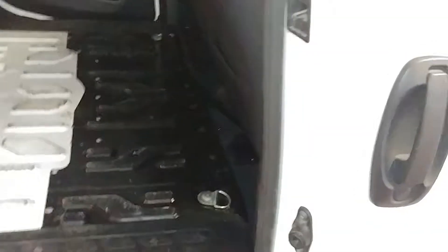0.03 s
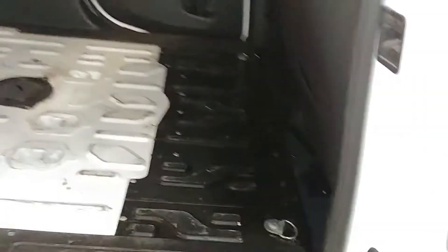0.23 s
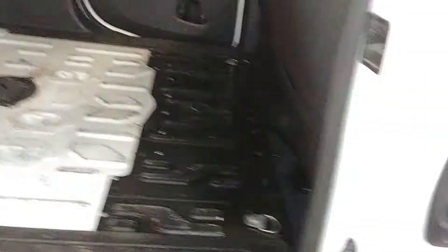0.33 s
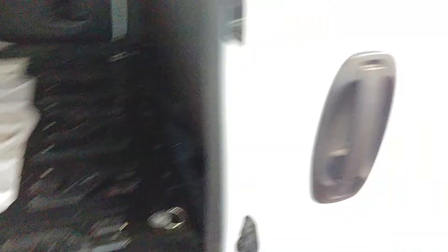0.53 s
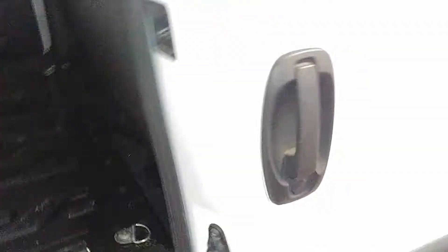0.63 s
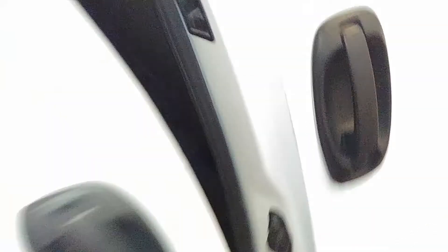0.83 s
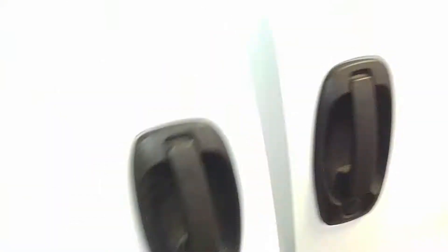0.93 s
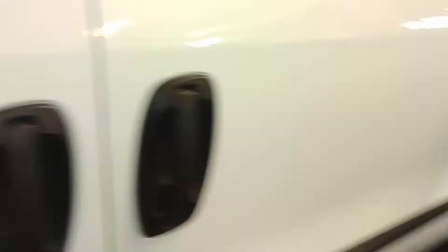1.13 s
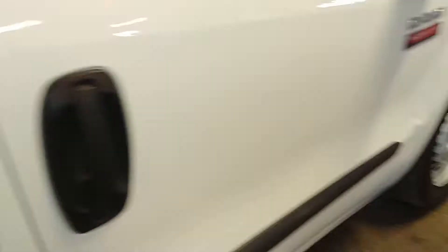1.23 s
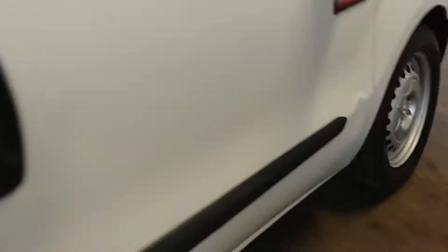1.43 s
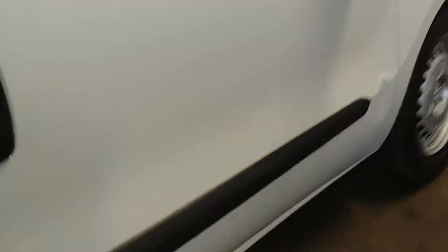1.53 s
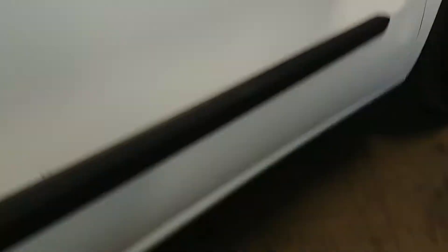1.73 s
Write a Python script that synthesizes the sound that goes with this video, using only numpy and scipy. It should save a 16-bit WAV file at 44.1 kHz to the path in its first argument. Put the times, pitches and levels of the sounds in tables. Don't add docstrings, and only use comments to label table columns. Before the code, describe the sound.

A van's sliding door closes, heard close up. Faint distant traffic and machinery hum, then small knocks at 0.2 s and a hard, bouncing metallic snap at 0.26 s. From about 0.4 s rollers rumble along the track, growing louder, with bright loose-metal ticks and hollow panel jolts. At 1.1 s it slams: latch crunch, deep body boom, low thumps until 1.4 s, then a long, spacious echo.

```python
import sys
import numpy as np
from scipy import signal
from scipy.fft import rfft, irfft
from scipy.io import wavfile
from scipy.ndimage import uniform_filter1d, minimum_filter1d

SR = 44100
rng = np.random.default_rng(int(sys.argv[2]) if len(sys.argv) > 2 else 0)


def dump_mix(stems):
    frames = np.atleast_2d(stems).T
    limited = np.clip(frames, -1, 1)
    pcm = np.round(limited * 32767).astype(np.int16)
    wavfile.write(sys.argv[1], SR, pcm)


def convert_level_to_amplitude(level_db):
    exponent = np.asarray(level_db, float) / 20
    return 10 ** exponent


N = 79380
T = np.arange(N) / SR

# frequency in Hz, density in dB per Hz.
YARD_AIR = [(40, -17.5), (80, 0), (200, -1), (500, -5.5), (1000, -13.5), (2500, -23), (5000, -46),
            (16000, -47)]
# frequency in Hz, width in Hz, level in dB.
YARD_HUMS = [(73, 18, -35.5), (374.2, 7.7, -36)]
YARD_DB = -36.5

# frequency in Hz, T60 in s.
ECHO_T60 = [(60, 1.03), (250, 1.78), (1000, 2.38), (2000, 2.95), (4000, 3.15), (8000, 0.42)]
# frequency in Hz, gain in dB.
ECHO_SEND = [(60, 1.5), (300, 1), (1000, 0), (2500, -3.5), (6000, -8.5), (13000, -12)]
# frequency in Hz, side share from 0 to 1.
SIDE_SHARE = [(60, 0.29), (300, 0.24), (1000, 0.93), (2500, 1.), (9000, 1.)]
ECHO_DB, ECHO_GAP_S = -6, 0.0027

# start in seconds, peak in dB, tilt in dB per octave.
TICKS = [(0.3257, -15.5, 3.5), (0.5818, -19, 5), (0.6037, -13.5, 4), (0.6272, -13.5, 6),
         (0.6401, -13.5, -2.5), (0.654, -30, -3.5), (0.6825, -13, 5.5), (0.6958, -38, -3.5),
         (0.7204, -18, 0), (0.8586, -19, -2.5), (0.8754, -25, 0.5), (.9674, -30.5, -15.5),
         (1.0866, -24, -3), (1.093, -13.5, -2.5), (1.1, -8, -0.5), (1.114, -19, 1), (1.165, -29, 0.5),
         (1.175, -29, -0.5)]
# frequency in Hz, density in dB per Hz.
TICK_SPECTRUM = [(1000, -24), (3000, -14), (5300, 7), (6500, -2.5), (8000, 0), (12500, 1), (16000, -4.5)]
TICK_T60_S = 0.013
RATTLE_START_S, RATTLE_END_S, RATTLE_FADE_S, RATTLE_DB = 0.49, 0.745, 0.012, -49

# start in seconds, peak in dB, tilt in dB per octave.
KNOCKS = [(.187, -20.5, -8), (.196, -22, -12), (.208, -24.5, 9.5), (.375, -19, 2), (.385, -29.5, -2),
          (.659, -17, -6), (.845, -21.5, 2), (.859, -15.5, 2), (.897, -31, 2), (.929, -23.5, -3.5),
          (.963, -15.5, -3), (1.079, -11, -1.5), (1.088, -9, -1.5), (1.097, -9.5, 1.5), (1.118, -32, -5),
          (1.165, -44, -10), (1.676, -29.5, -4.5)]
# frequency in Hz, density in dB per Hz.
KNOCK_SPECTRUM = [(200, -18), (700, -0.5), (1800, 3), (2800, -0.5), (3900, -1), (5300, -6), (8000, -16.5),
                  (16000, -21)]
KNOCK_T60_S = 0.08

# start in seconds, peak in dB, frequency in Hz of the panel mode favoured.
JOLTS = [(0.237, -14, 157.4), (.256, -16.5, 567), (.268, -12.5, 303), (.285, -15.5, 317.4),
         (.305, -23, 331), (.312, -14, 124), (0.42, -18.5, 167), (0.434, -23, 252), (0.47, -14.5, 233.2),
         (.495, -13, 148.7), (0.528, -22.5, 184), (0.564, -9, 233.6), (.567, -15, 331), (0.606, -17.5, 216),
         (.63, -13.5, 424), (.652, -13.5, 416), (.672, -22.5, 418), (.648, -19, 247.5), (0.687, -16, 180.5),
         (.714, -21, 164), (.72, -24, 495), (0.755, -12.5, 386), (.8, -13.5, 603), (.82, -13.5, 657.7),
         (.766, -11.5, 267), (0.787, -6, 168), (0.815, -14, 350.5), (.83, -3, 245.3), (0.871, -10, 172),
         (.884, -6, 331), (0.893, -10.5, 138), (.928, -25, 185), (.958, -9.5, 542.4), (.962, -6.5, 197),
         (1.012, -10, 192), (1.036, -11, 504), (1.065, -10.5, 558), (1.075, -11.5, 671.7), (1.09, -24, 794),
         (1.043, -6, 178), (1.088, -15.5, 116.6), (1.098, -10, 468.4), (1.108, -3.5, 102),
         (1.145, -5.5, 76.6), (1.154, -11.5, 182), (1.18, -3.5, 101.3), (1.2, -11, 95), (1.24, -10, 86.2),
         (1.271, -12.5, 96.4), (1.312, -10, 81.7), (1.405, -16, 83.6), (1.521, -16, 87.3)]
# time in seconds, left minus right in dB.
DOOR_PAN = [(.3, 5.5), (.9, 5.5), (1.05, 2.5), (1.15, -0.5), (1.3, -8), (1.4, 13)]
JOLT_RISE_S, JOLT_T60_S = 0.0064, 0.069

# time in seconds, level in dB, extra weight of the low panel modes in dB.
ROLL_EFFORT = [(.36, -53.5, 2), (0.432, -22.5, 4.5), (0.491, -22.5, 2), (0.564, -13.5, -2.5),
               (0.651, -15, -10.5), (.734, -10.5, -5.5), (0.83, -6.5, 7.5), (0.869, -15.5, 17.5),
               (.9, -12, -0.5), (0.949, -17.5, 11), (0.972, -14.5, 14), (1.011, -18, 3), (1.053, -9.5, 3),
               (1.095, -10, -9), (1.13, -11.5, 1.5)]
# frequency in Hz, density in dB per Hz.
PANEL_SPECTRUM = [(50, -30), (158, -0.5), (261, 1), (459, -6), (664, -7.5), (1500, -21), (3000, -25),
                  (6000, -59.5), (16000, -73)]
PANEL_MODES_HZ = [83, 128, 166, 207, 256, 320, 365, 418, 495, 545, 594, 655, 870, 1150]
BUMPS_PER_S, BUMP_SCATTER_DB, WANDER_DB = 1800, 2.5, 2.5
PANEL_T60_S, LOW_MODES_HZ, ROLL_CUT_HZ = 0.13, 230, 83
RING_DB, GRIT_DB = -6.5, -4.5

# start in seconds, peak in dB.
SNAPS = [
    (.2564, -3),
    (.2586, -6),
    (.2652, -2),
    (.2738, -8.5),
    (.286, -13.5),
]
# frequency in Hz, level in dB, T60 in s.
CATCH_MODES = [(1022, 0, 0.028), (1340, -3, 0.025), (1750, -3, 0.19), (1893, 0.5, 0.067), (2037, -9, 0.1),
               (2230, -13, 0.24), (3090, -11, 0.026), (6040, -3, 0.044), (7670, -15, 0.041),
               (8300, -17, 0.17), (10200, 0.5, .07), (13200, -11, 0.13), (14700, -10.5, 0.053),
               (312.7, -3.5, 0.11)]
# frequency in Hz, density in dB per Hz.
CRACK_SPECTRUM = [(200, -36), (500, -1), (1000, -7), (1900, -4.5), (3500, -14), (6000, -19), (10000, -17.5),
                  (16000, -27.5)]
CATCH_SPREAD_DB, CRACK_DB, CRACK_T60_S = 2, -20, 0.23
SPIKE_DB, SPIKE_T60_S = 6.5, 0.028

# frequency in Hz, density in dB per Hz.
LATCH_SPECTRUM = [(300, 1), (600, 13.5), (1300, -5.5), (2090, 1), (2600, -13), (5600, -21.5), (8000, -27),
                  (16000, -33)]
LATCH_S, LATCH_RISE_S, LATCH_HOLD_S, LATCH_T60_S, LATCH_DB = 1.073, 0.019, 0.0086, 0.11, -11

# start in seconds, peak in dB, push length in s.
BLOWS = [(.19, -14.5, 0.00068), (.245, -5.5, 0.00099), (.258, -12.5, 0.0011), (.275, -6.5, 0.0018),
         (.321, -12, 0.0088), (.89, -12, 0.0072), (.965, -18, 0.0059), (1.045, -18, 0.0021),
         (1.078, -7, 0.00066), (1.097, 10, 0.0014), (1.116, -10.5, 0.0037), (1.148, -4, 0.0023),
         (1.183, 0, 0.007), (1.25, -15.5, 0.007), (1.272, -12, 0.0069), (1.318, -7.5, 0.0092),
         (1.36, -6.5, 0.0058), (1.385, -4.5, 0.006), (1.408, -9.5, 0.015)]
# frequency in Hz, level in dB, T60 in s.
BODY_MODES = [(64.4, -47, .3), (85.2, -9, 0.32), (105, -12, 0.043), (145.9, 2, 0.17), (219, -1, 0.12),
              (271, -0.5, 0.17), (325, -2.5, 0.16), (443, 0.5, 0.17), (503, -3, 0.13), (604, -36, .1),
              (827, -2.5, 0.15)]
BODY_SPREAD_DB = 3

# frequency in Hz, gain in dB.
MIC = [(25, -35), (55, -2), (6200, 2), (6900, 1.5), (7800, 11), (8800, -2.5), (11000, -21), (13000, -7)]
# frequency in Hz, left minus right in dB.
PORTS = [(60, 1), (200, 2), (600, 1.5), (1200, -2.5), (2500, 1), (5000, 2), (8000, 3.5), (13000, 1)]
PORT_LAG_S, CATCH_LAG_S = 0.00016, 0.00005
MIC_TOP_HZ, LIMIT_PEAK, LIMIT_S = 15700, 1, 0.0025


def level(x, db):
    return x * convert_level_to_amplitude(db) / np.sqrt(np.mean(x ** 2))


def read(table, hz):
    table_hz, value = np.array(table).T
    return np.interp(np.log(hz), np.log(table_hz), value)


def colour(x, table):
    bins_hz = np.arange(2049) * SR / 4096 + 1
    cepstrum = irfft(np.log(convert_level_to_amplitude(read(table, bins_hz))))
    cepstrum[1:2048] *= 2
    cepstrum[2049:] = 0
    return signal.fftconvolve(x, irfft(np.exp(rfft(cepstrum))))[:N]


def band(x, hz, width_hz):
    return signal.lfilter(*signal.iirpeak(hz, hz / width_hz, SR), x)


def ring(x, modes):
    out = 0
    for hz, db, t60_s in modes:
        pole = np.exp((2j * np.pi * hz - np.log(1000) / t60_s) / SR)
        out = out + convert_level_to_amplitude(db) * signal.lfilter([1], [1, -pole], x).imag
    return out


def strikes(rows, modes, spread_db):
    out = np.zeros(N)
    for start_s, peak_db, push_s in rows:
        i = int(start_s * SR)
        push = np.hanning(int(push_s * SR) + 3)[1:-1]
        chance = rng.standard_normal(len(modes))
        struck = [(hz * (1 + 0.011 * k), db + spread_db * k, t60_s)
                  for (hz, db, t60_s), k in zip(modes, chance)]
        y = ring(np.r_[push, np.zeros(N)][:N - i], struck)
        out[i:] += y * convert_level_to_amplitude(peak_db) / np.abs(y).max()
    return out


def bursts(rows, table, t60_s, pivot_hz):
    out = np.zeros(N)
    fade = convert_level_to_amplitude(-60 * T[:8192] / t60_s)
    for start_s, peak_db, tilt in rows:
        i = int(start_s * SR)
        tint = rng.standard_normal(len(table))
        spectrum = [(hz, db + 2 * k + tilt * np.log2(hz / pivot_hz)) for (hz, db), k in zip(table, tint)]
        y = colour(rng.standard_normal(8192) * fade, spectrum)[:N - i]
        out[i:i + len(y)] += y * convert_level_to_amplitude(peak_db) / np.abs(y).max()
    return out


def grains(rate, scatter_db):
    when, sign, size = rng.random((3, N))
    return (when < rate / SR) * np.sign(sign - 0.5) * convert_level_to_amplitude(-scatter_db * np.log(size + 1e-9))


def walk(rate_hz):
    k = int(SR / rate_hz)
    steps = np.repeat(rng.standard_normal(N // k + 1), k)
    return 4 / 3 * uniform_filter1d(uniform_filter1d(steps, k), k)[:N]


def wide(mid, side):
    side = colour(side, [(hz, 20 * np.log10(max(share, 0.01))) for hz, share in SIDE_SHARE])
    return np.array([mid + side, mid - side])


def lean(pan_db):
    return convert_level_to_amplitude(np.array([[pan_db / 2], [-pan_db / 2]]))


def place(x, pan_db, lag_s):
    return np.array([x * convert_level_to_amplitude(pan_db / 2), np.interp(T - lag_s, T, x) * convert_level_to_amplitude(-pan_db / 2)])


def yard():
    air = [level(colour(rng.standard_normal(N) * convert_level_to_amplitude(walk(6)), YARD_AIR), YARD_DB + 3) for _ in range(2)]
    hum = sum(level(band(rng.standard_normal(N), hz, width_hz), db) for hz, width_hz, db in YARD_HUMS)
    return wide(air[0] + hum, air[1])


def echo_tail():
    t = np.maximum(T - ECHO_GAP_S, 0)
    tail = np.zeros(N)
    for hz in 45 * 2.0 ** np.arange(9):
        t60_s = read(ECHO_T60, hz)
        decay = convert_level_to_amplitude(-60 * t / t60_s) * (t > 0) / np.sqrt(t60_s)
        tail += band(rng.standard_normal(N), hz, hz * 0.74) * decay
    return level(tail, ECHO_DB) / np.sqrt(N)


def echo(x):
    return wide(*(signal.fftconvolve(x, echo_tail())[:N] for _ in range(2)))


def rattle():
    corners_s = [RATTLE_START_S - RATTLE_FADE_S, RATTLE_START_S, RATTLE_END_S, RATTLE_END_S + RATTLE_FADE_S]
    env = np.interp(T, corners_s, [0, 1, 1, 0])
    chatter = [level(colour(grains(rate=9800, scatter_db=1), TICK_SPECTRUM), RATTLE_DB) for _ in range(2)]
    return wide(*(c * env for c in chatter))


def loose_part_ticks():
    return bursts(TICKS, TICK_SPECTRUM, TICK_T60_S, pivot_hz=7000)


def joint_knocks():
    return bursts(KNOCKS, KNOCK_SPECTRUM, KNOCK_T60_S, pivot_hz=1000)


def jolts():
    out = np.zeros(N)
    t = T[:SR // 3]
    for start_s, peak_db, hz in JOLTS:
        i = int(start_s * SR)
        t60_s = JOLT_T60_S * (200 / hz) ** 0.19
        env = (1 - np.exp(-t / JOLT_RISE_S)) ** 2 * convert_level_to_amplitude(-60 * t / t60_s)
        y = (env / env.max() * np.sin(2 * np.pi * (hz * t + rng.random())))[:N - i]
        out[i:i + len(y)] += convert_level_to_amplitude(peak_db) * y
    return out


def rollers():
    s, db, weight_db = np.array(ROLL_EFFORT).T
    effort = convert_level_to_amplitude(np.interp(T, np.r_[s[0] - 0.06, s, s[-1] + 0.03], np.r_[-60, db, -60]))
    weight = convert_level_to_amplitude(np.interp(T, s, weight_db))
    bumps = grains(BUMPS_PER_S, BUMP_SCATTER_DB)
    panel = np.zeros(N)
    for hz in PANEL_MODES_HZ:
        drive = bumps * convert_level_to_amplitude(WANDER_DB * walk(11.0)) * (weight if hz < LOW_MODES_HZ else 1)
        panel += ring(drive, [(hz, read(PANEL_SPECTRUM, hz), PANEL_T60_S * (300 / hz) ** 0.18)])
    grit = colour(grains(rate=6000, scatter_db=2.5) * convert_level_to_amplitude(0.41 * walk(29.46)), PANEL_SPECTRUM)
    small = signal.butter(2, ROLL_CUT_HZ, "high", fs=SR)
    return effort * signal.lfilter(*small, level(panel, RING_DB) + level(grit, GRIT_DB))


def catch_snap():
    return strikes([(s, db, 0) for s, db in SNAPS], CATCH_MODES, CATCH_SPREAD_DB)


def catch_crack():
    t = np.maximum(T - SNAPS[0][0], 0)
    fade = (convert_level_to_amplitude(-60 * t / CRACK_T60_S) + convert_level_to_amplitude(SPIKE_DB - 60 * t / SPIKE_T60_S)) * (t > 0)
    noise = [level(colour(grains(rate=10000, scatter_db=1.5), CRACK_SPECTRUM), CRACK_DB) for _ in range(2)]
    return wide(*(c * fade for c in noise))


def latch():
    t = T - LATCH_S
    fall_s = np.maximum(t - LATCH_RISE_S - LATCH_HOLD_S, 0)
    env = np.clip(t / LATCH_RISE_S, 0, 1) * convert_level_to_amplitude(-60 * fall_s / LATCH_T60_S)
    noise = [level(colour(grains(rate=9000, scatter_db=3.5), LATCH_SPECTRUM), LATCH_DB) for _ in range(2)]
    return wide(*(c * env for c in noise))


def body_boom():
    return strikes(BLOWS, BODY_MODES, BODY_SPREAD_DB)


def scene():
    ticks, knocks, shakes, roll = loose_part_ticks(), joint_knocks(), jolts(), rollers()
    snap, crack, crunch, boom = catch_snap(), catch_crack(), latch(), body_boom()
    door_pan_db = np.interp(T, *np.array(DOOR_PAN).T)

    direct = rattle() * lean(10.0)
    direct += place(ticks, 4.7, PORT_LAG_S)
    direct += place(knocks, 0.3, CATCH_LAG_S)
    direct += place(shakes, door_pan_db, PORT_LAG_S)
    direct += place(roll, 4.8, PORT_LAG_S)
    direct += place(snap, 2.7, CATCH_LAG_S) + crack * lean(12.6)
    direct += crunch * lean(-1.4)
    direct += place(boom, 0.33, PORT_LAG_S / 2)

    sent = roll + ticks + knocks + crack[0] + crunch[0]
    sent = sent + convert_level_to_amplitude(-13.5) * snap + convert_level_to_amplitude(-0.5) * boom + convert_level_to_amplitude(-3.0) * shakes
    return direct + echo(colour(sent, ECHO_SEND)) * lean(0.94) + yard() * lean(5.0)


def band_limit(x):
    return signal.sosfilt(signal.butter(12, 16820, fs=SR, output="sos"), x)


def record(dry):
    x = np.array([colour(colour(side, MIC), [(hz, db * share) for hz, db in PORTS])
                  for side, share in zip(dry, (0.5, -0.5))])
    x = signal.sosfilt(signal.ellip(6, 0.5, 35, MIC_TOP_HZ, fs=SR, output="sos"), x)
    k = int(LIMIT_S * SR) + 1
    needed = np.minimum(1, LIMIT_PEAK / (np.abs(x) + 1e-9))
    gain = uniform_filter1d(minimum_filter1d(needed, k), k)
    return band_limit(np.clip(x * gain, -1, 1))


dry = scene()
out = record(dry)
dump_mix(out)
```